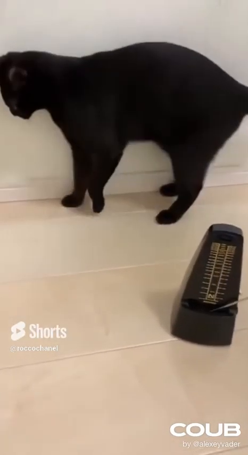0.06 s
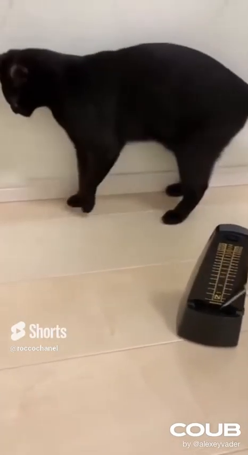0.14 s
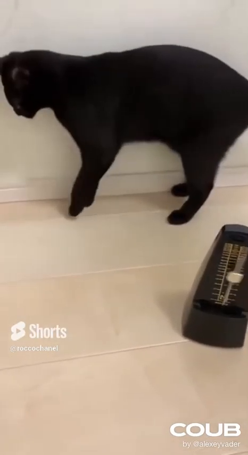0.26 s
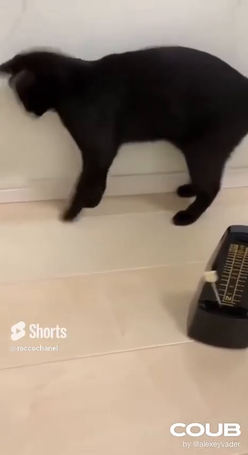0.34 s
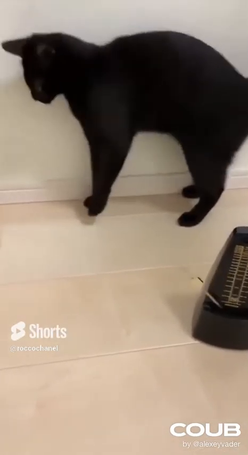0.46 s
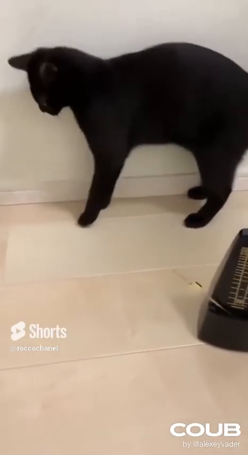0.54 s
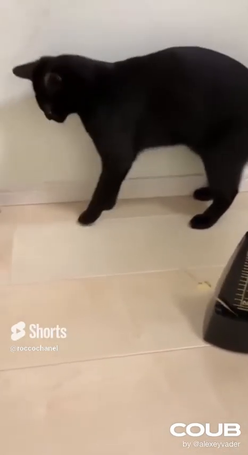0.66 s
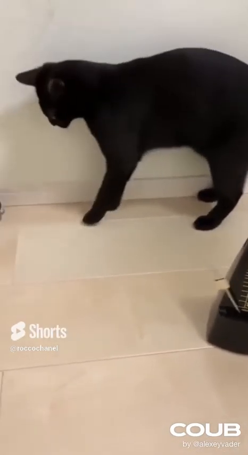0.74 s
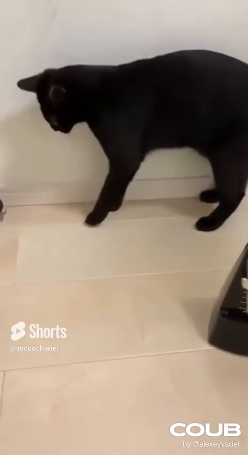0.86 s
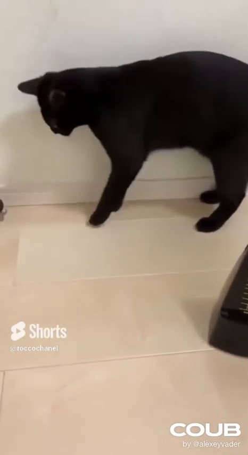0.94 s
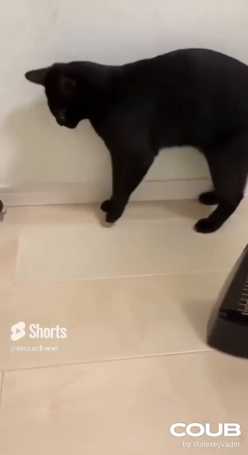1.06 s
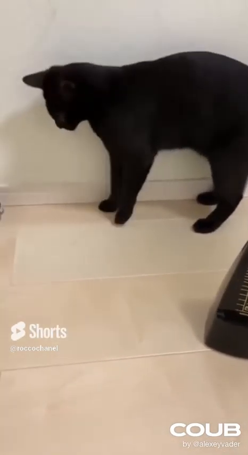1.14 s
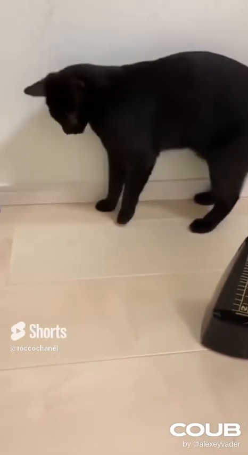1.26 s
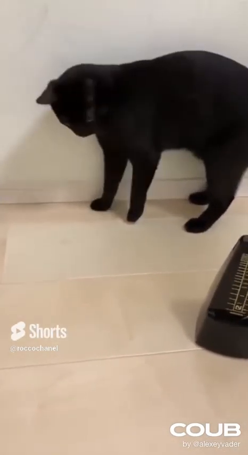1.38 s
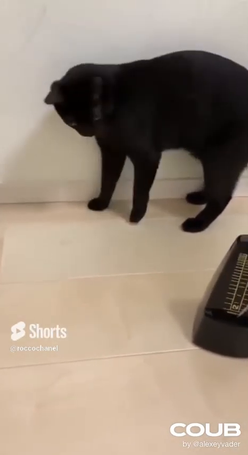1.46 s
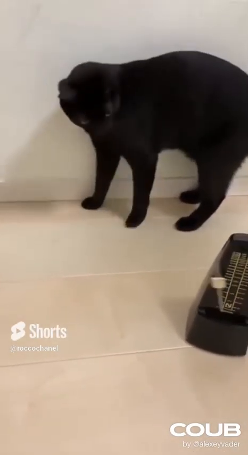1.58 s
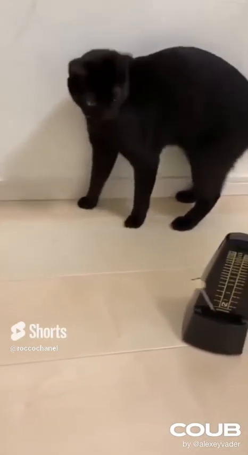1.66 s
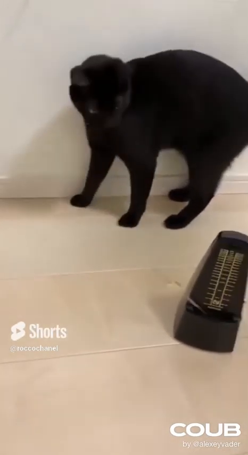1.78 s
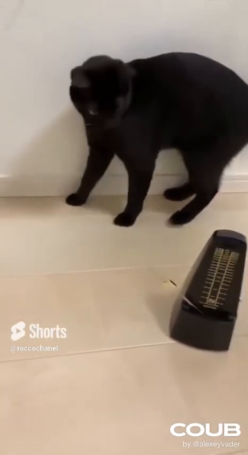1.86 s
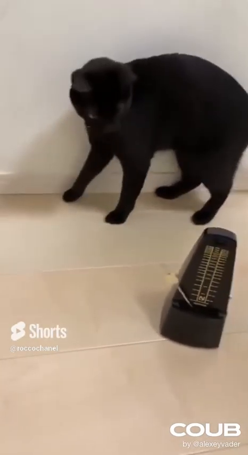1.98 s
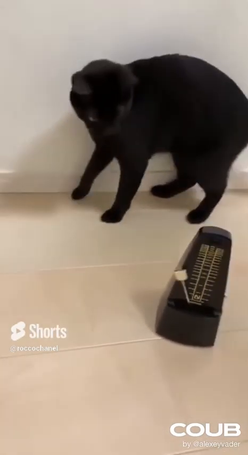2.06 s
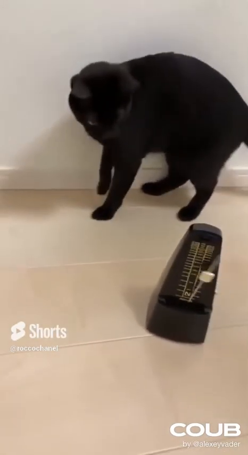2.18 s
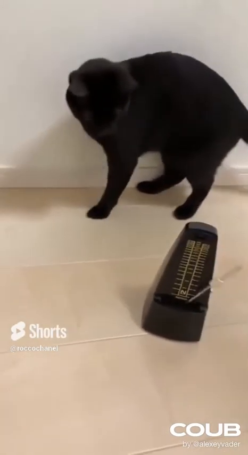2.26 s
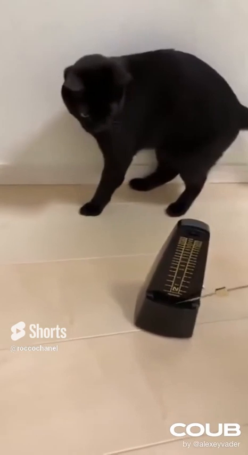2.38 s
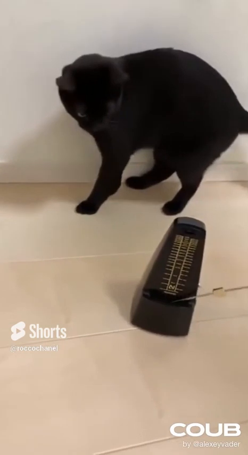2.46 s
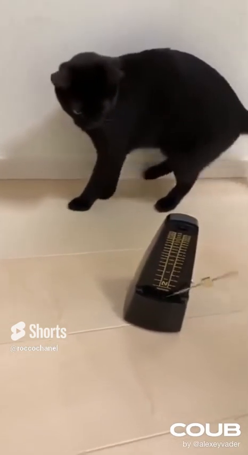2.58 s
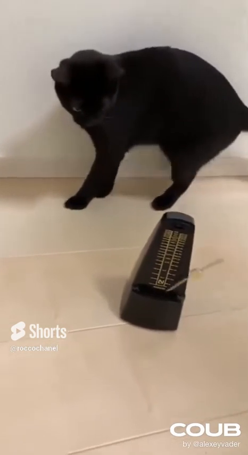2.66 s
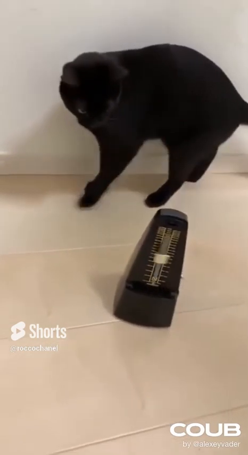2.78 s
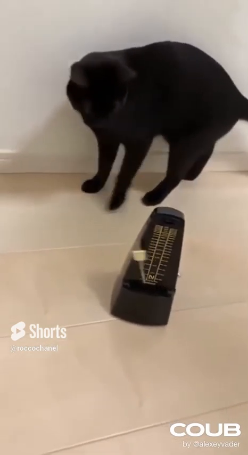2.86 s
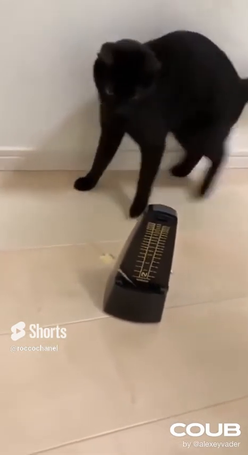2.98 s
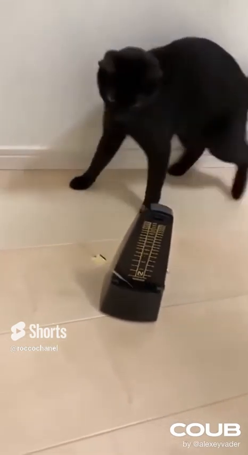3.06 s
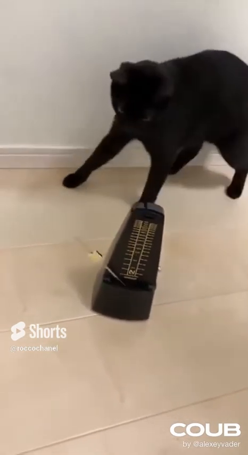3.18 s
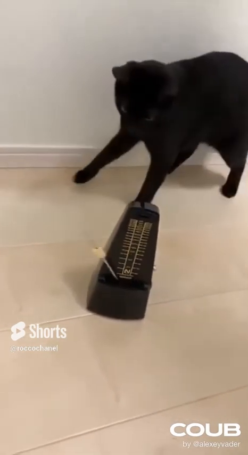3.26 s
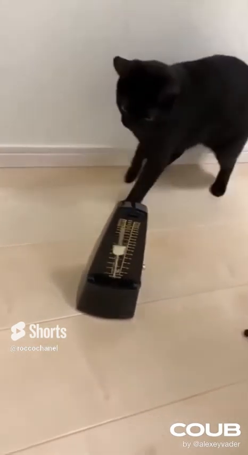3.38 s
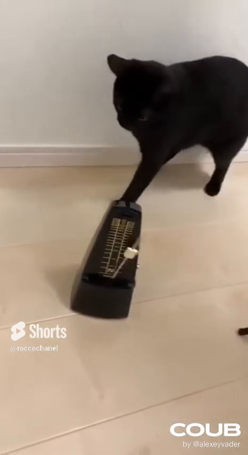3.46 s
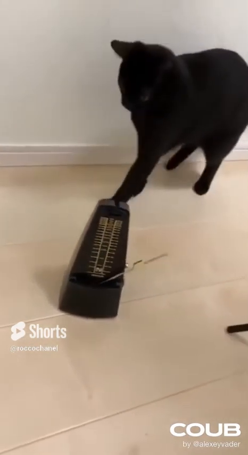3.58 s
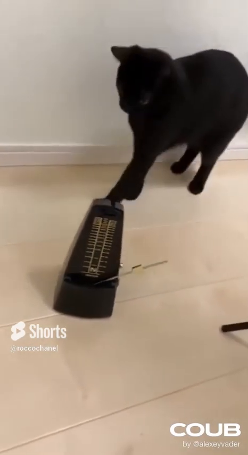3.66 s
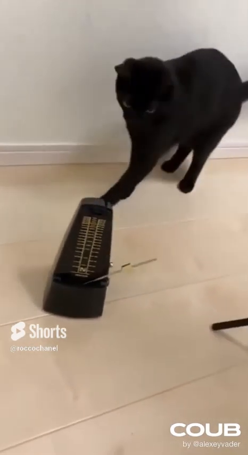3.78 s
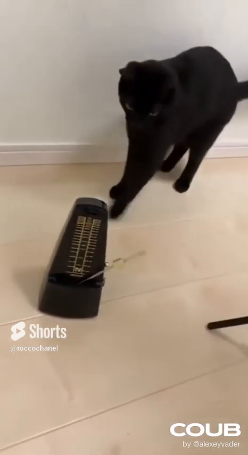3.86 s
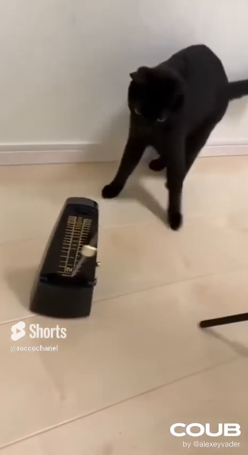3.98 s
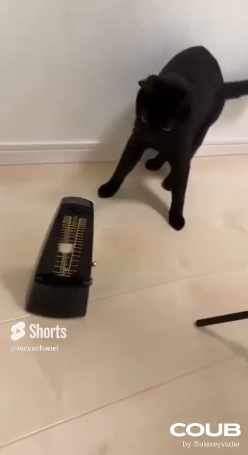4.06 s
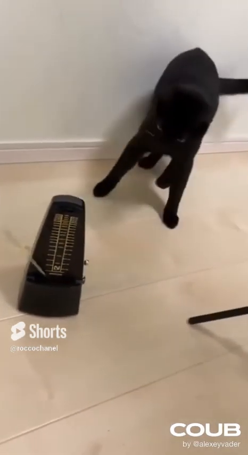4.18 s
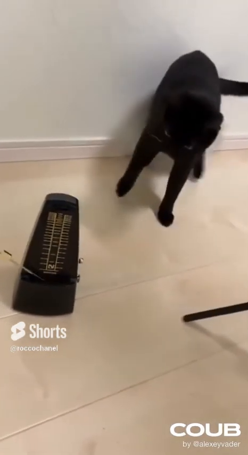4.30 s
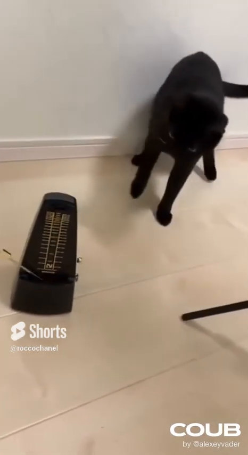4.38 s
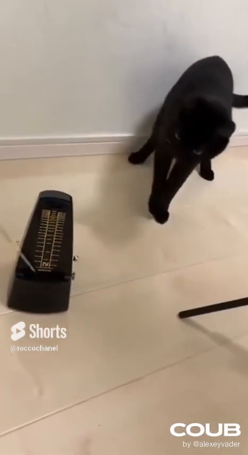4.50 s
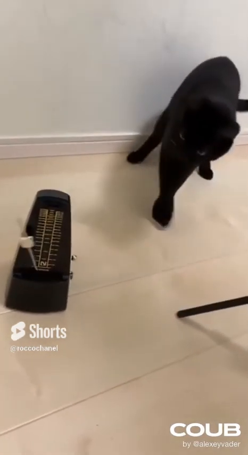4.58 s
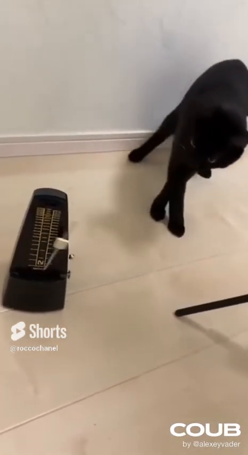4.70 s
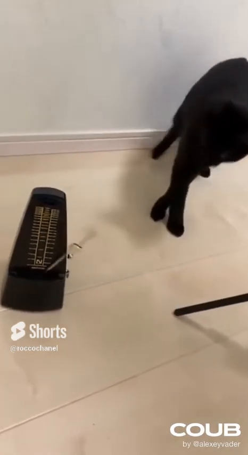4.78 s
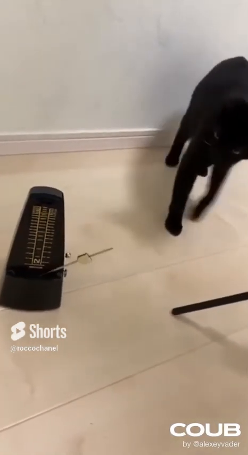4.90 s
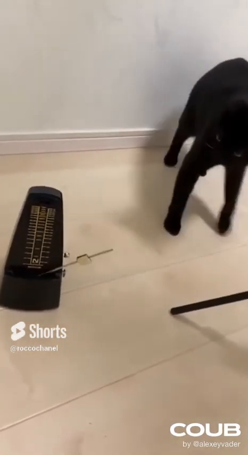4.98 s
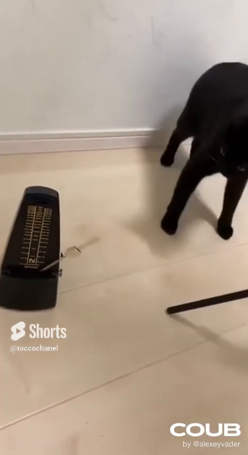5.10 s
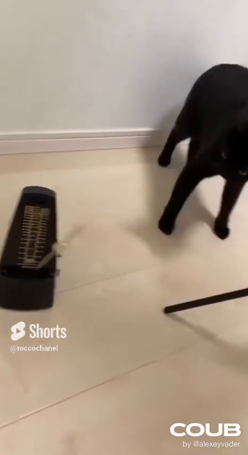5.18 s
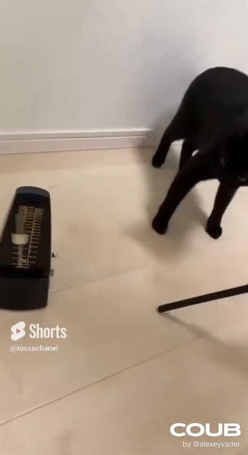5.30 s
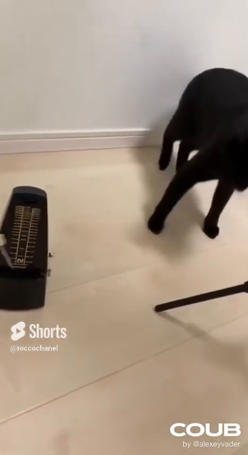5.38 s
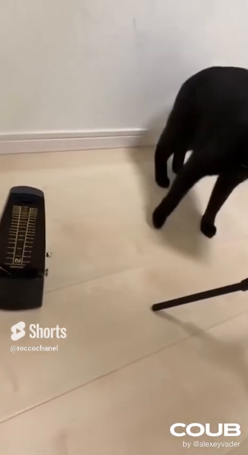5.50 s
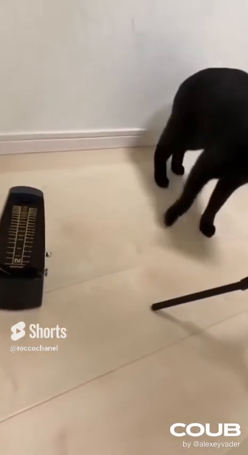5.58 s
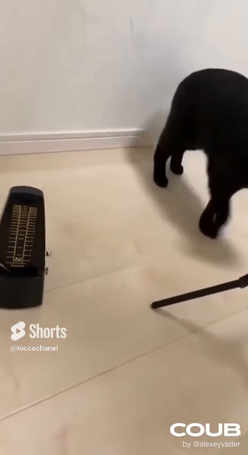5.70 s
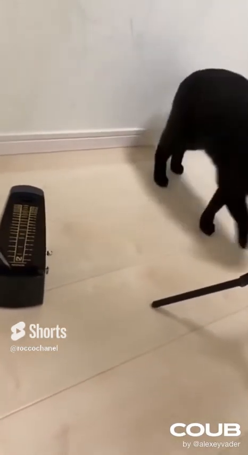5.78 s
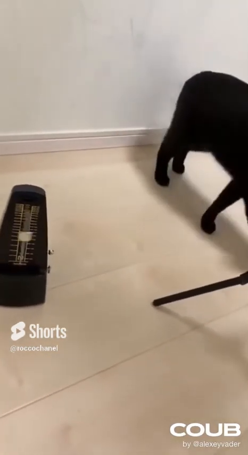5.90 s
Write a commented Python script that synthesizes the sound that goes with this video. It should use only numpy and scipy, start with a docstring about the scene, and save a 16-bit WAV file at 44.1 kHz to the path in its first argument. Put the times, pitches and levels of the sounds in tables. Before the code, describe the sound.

A wind-up pendulum metronome ticks close by on the wooden floor of a small, bare room. The first tick comes at about 0.4 seconds, and eight more follow evenly, roughly 0.63 seconds apart, the last near 5.4 seconds. Each is a sharp, bright mechanical clack, led in by a very faint swish and followed by a brief hollow ring of the plastic case, a short room echo and a soft low boom from the boards. The ticks vary slightly in strength and ring a little more from about 3.5 seconds on. A cat's paws are nearly inaudible: tiny scuffs around 2 and 2.6 seconds, a soft low thud near 3.2 seconds, and a fainter step just after 5 seconds. A faint, dull rush of ventilation with a wavering low hum continues underneath throughout.

```python
"""Metronome in a bare room

A wind-up pendulum metronome ticks on a wooden floor, about 95 beats a minute. Each beat is a clatter
of the escapement, an impulse that excites the modes of the plastic case, the reverberation of the
small room and the low modes of room and floor. A faint swish is heard just before each tick.
A cat steps about nearly unheard; the faint hum of ventilation lies underneath."""
import sys
import numpy as np
from scipy import signal
from scipy.fft import rfft, irfft
from scipy.io import wavfile

SR = 44100
rng = np.random.default_rng(int(sys.argv[2]) if len(sys.argv) > 2 else 0)


def persist_wave(psi):
    """Save psi, clipped to +-1, as 16-bit WAV."""
    counts = np.round(np.clip(psi, -1, 1) * 32767).astype(np.int16)
    wavfile.write(sys.argv[1], SR, np.atleast_2d(counts).T)


N = 261954
AGE = np.arange(SR * 3 // 4) / SR   # time since a blow, s


def from_db(db):
    """Amplitude ratio: a factor of ten for every 20 dB."""
    return 10 ** (np.asarray(db) / 20)


def at_hz(points, hz):
    """Interpolation of a table on a logarithmic frequency axis."""
    knots, values = np.transpose(points)
    return np.interp(np.log(np.maximum(hz, 1)), np.log(knots), values)


def unit_energy(x):
    """Normalisation of each row to energy 1."""
    return x / np.sqrt(np.sum(x ** 2, axis=-1, keepdims=True) + 1e-20)


def coloured(spectrum, size, tilt_db=0, ripple_db=0, ripple_hz=70):
    """Random-phase noise: two rows of rms 1, tilted per octave about 3 kHz, rippled by interference."""
    hz = np.arange(size // 2 + 1) * SR / size
    octaves = np.log2(np.maximum(hz, 1000) / 3000)
    ripple = np.interp(hz / ripple_hz, np.arange(1024), rng.standard_normal(size=1024))
    depth_db = ripple_db * (hz / 3000) ** 0.29   # short waves interfere more deeply
    gain = from_db(at_hz(spectrum, hz) + tilt_db * octaves + depth_db * np.minimum(ripple, 1))
    phasors = np.exp(2j * np.pi * rng.random((2, len(hz))))
    return unit_energy(irfft(gain * phasors, size)) * np.sqrt(size)


# side relative to middle, for direct and for diffuse sound: f/Hz, level/dB
WIDTH_DIRECT = [(300, -28.5), (1200, -19), (5000, -20), (8000, -14.5), (14000, -6.5)]
WIDTH_DIFFUSE = [(60, -28.5), (170, -19), (330, -13.5), (600, -5), (1200, -2), (4000, -2), (9000, -6.5)]


def stereo(pair, width, wider_db=0):
    """Interaural coherence: middle plus or minus side; long waves reach both ears alike."""
    size = pair.shape[-1]
    hz = np.arange(size // 2 + 1) * SR / size
    side = irfft(rfft(pair[1]) * from_db(at_hz(width, hz) + wider_db), size)
    return pair[0] + side * np.array([[1], [-1]])


def decay(t60):
    """Exponential damping: 60 dB in t60 seconds."""
    return from_db(-60 * AGE / t60)


def onset(build_s):
    """Smooth build-up of amplitude from 0 to 1."""
    return 1 - np.exp(-(AGE / build_s) ** 2)


def mode(hz, db, t60, build_s):
    """Damped oscillation: a sinusoid of random phase builds up and dies away."""
    return from_db(db) * onset(build_s) * decay(t60) * np.sin(2 * np.pi * (hz * AGE + rng.random()))


def add(out, t, sound):
    """Superposition of a sound starting at t seconds."""
    start = round(t * SR)
    out[:, start:start + sound.shape[-1]] += sound[..., :N - start]


# spectrum of the moving air: f/Hz, level/dB
AIR_SPECTRUM = [(20, -26), (50, -3), (90, 0), (135, -19.5), (185, -2.5), (260, -11), (440, -16),
                (650, -20.5), (1000, -32), (4000, -41), (4800, -45.5), (6500, -38.5), (11000, -47),
                (16000, -60)]
# resonances of the ventilation: f/Hz, bandwidth/Hz, level/dB
HUM_BANDS = [(316, 25, -67.5), (343, 25, -64), (369.9, 22, -63.5)]


def ventilation(air_db=-63.5):
    """Resonance: narrow bands of noise make a wavering hum over a dull rush of air."""
    hz = np.arange(N // 2 + 1) * SR / N
    out = from_db(air_db) * coloured(AIR_SPECTRUM, N)
    for centre, bandwidth, db in HUM_BANDS:
        resonance = 1 / (1 + (2 * (hz - centre) / bandwidth) ** 2)
        hum = irfft(rfft(rng.standard_normal((2, N))) * resonance, N)
        out += from_db(db) * unit_energy(hum) * np.sqrt(N)
    return stereo(out, WIDTH_DIFFUSE, wider_db=-0.5)


# spectrum of the clatter, also used for the faint swish and the scuff of paws: f/Hz, level/dB
CLATTER_SPECTRUM = [(120, -17.5), (300, -6), (800, 2), (2200, 0.5), (2900, -8.5), (3500, 4), (4150, 2),
                    (4700, -12), (5600, -2), (9500, -4), (10300, -11), (12500, -14), (16000, -21.5)]


def swish(rise_t60=.053, gain_db=-32, size=2205):
    """Exponential growth: a faint rising noise is heard just before each tick."""
    noise = coloured(CLATTER_SPECTRUM, len(AGE), tilt_db=-0.87, ripple_db=5, ripple_hz=120)
    fading = stereo(noise, WIDTH_DIRECT, wider_db=5.5) * decay(rise_t60)
    return from_db(gain_db) * fading[:, :size][:, ::-1]


def escapement(tilt_db, width_db, gain_db=-17, chatter_s=.0055, fade_s=.0024):
    """Impact and early reflection: the pallet chatters on the wheel; floor and wall throw it back."""
    contact = np.exp(-np.maximum(AGE - chatter_s, 0) / fade_s)
    chatter = coloured(CLATTER_SPECTRUM, len(AGE), tilt_db, ripple_db=7.5, ripple_hz=219.2)
    direct = stereo(chatter, WIDTH_DIRECT, width_db) * onset(build_s=.0015) * contact
    scatter = coloured(CLATTER_SPECTRUM, len(AGE), tilt_db, ripple_db=5, ripple_hz=110)
    reflected = stereo(scatter, WIDTH_DIFFUSE, wider_db=-3) * (1 - contact) * decay(t60=.085)
    return from_db(gain_db) * (direct + from_db(-6.5) * reflected)


# modes of the plastic case: f/Hz, level/dB, T60/s
CASE_MODES = [(500.5, -26.5, 0.076), (746, -31.5, .06), (945, -34, .11), (1112.7, -18, .07),
              (1265, -29, 0.077), (1715, -27, 0.078), (2200, -30.5, 0.063), (3198, -31, 0.07),
              (3450, -20.5, 0.048), (3498, -30, 0.08), (4000, -27, 0.015), (4070, -20.5, 0.054),
              (6260, -34, 0.06), (6640, -36, .06), (7720, -27, 0.035), (9100, -31, 0.033)]


def case(low_db, high_db, split_hz=2500, spread_db=2.16, detune=.002):
    """Free vibration: every beat strikes the modes of the case a little differently."""
    out = 0
    for hz, db, t60 in CASE_MODES:
        strength_db = (high_db if hz > split_hz else low_db) + spread_db * rng.normal()
        out += mode(hz * (1 + detune * rng.normal()), db + strength_db, t60, build_s=.0028)
    return out


# spectrum of the diffuse field: f/Hz, level/dB
REVERB_SPECTRUM = [(100, -17.5), (450, -4), (620, -5), (950, 1), (1450, -2.5), (2200, -2.5), (2900, -6),
                   (3900, -6.5), (4300, -11), (4750, -22), (5500, -8), (9500, -8), (10300, -11.5),
                   (16000, -28)]
# reverberation time of the room: f/Hz, T60/s
REVERB_TIME = [(150, 0.46), (500, .27), (1500, 0.26), (4000, 0.25), (8500, 0.23), (16000, .23)]


def reverberation(tilt_db, gain_db=-24, case_share=0.82, bands=10):
    """Diffuse reflection from bare walls, coloured by the case; each band decays at its own rate."""
    noise = coloured(REVERB_SPECTRUM, len(AGE), tilt_db, ripple_db=5, ripple_hz=74.78)
    spectrum = rfft(stereo(noise, WIDTH_DIFFUSE))
    hz = np.arange(spectrum.shape[-1]) * SR / len(AGE)
    case_peaks = sum(1 / (1 + ((hz - f) * t60) ** 2) for f, _, t60 in CASE_MODES)
    spectrum *= 1 + case_share * case_peaks
    centres = np.geomspace(100, 16000, bands)
    tail = 0
    for centre, share in zip(centres, np.eye(bands)):
        band = irfft(spectrum * np.interp(hz, centres, share), len(AGE))
        tail += band * decay(at_hz(REVERB_TIME, centre))
    return from_db(gain_db) * tail * onset(build_s=.0063)


# low modes between the walls: f/Hz, level/dB, T60/s
ROOM_MODES = [(152, -38, 0.25), (179.6, -38.5, .18), (271, -45, .25), (304, -31, 0.23), (343.4, -34.5, .28),
              (379, -41, 0.18)]


def standing_waves(spread_db=0.4):
    """Standing waves between the walls build up slowly and differ a little from ear to ear."""
    pair = np.zeros((2, len(AGE)))
    for row in pair:
        for hz, db, t60 in ROOM_MODES:
            row += mode(hz, db + spread_db * rng.normal(), t60, build_s=.02)
    return stereo(pair, WIDTH_DIFFUSE)


# beats: t/s, force/dB, blur/dB, left minus right/dB, floor boom/dB
BEATS = [(.388, .5, 8.5, -5, 1.5), (1.02, 0.5, 8, -.5, -10), (1.646, 2.5, -4, -.5, -7.5),
         (2.281, -2, 6, -6, -3), (2.906, 0.5, 4, 0, -9.5), (3.539, 2, 2.5, -0.5, -2),
         (4.166, 1, 0.5, 0, -10), (4.799, 1.5, -2, -.5, 0.5), (5.427, -2, 0.5, -0.5, 3)]
# the case rings out more as the listener moves round to its front: t/s, low modes/dB, high modes/dB
CASE_RADIATION = [(.4, 0, -3), (2.3, .5, -1.5), (4.6, 4.5, 4.5), (5.4, 1, 4)]


def metronome(room_db=0.51):
    """Impulse excitation: each beat drives case and room; blur means a louder swish and a wider tick."""
    out = np.zeros((2, N))
    times, low_db, high_db = np.transpose(CASE_RADIATION)
    for t, force_db, blur_db, pan_db, _ in BEATS:
        pan = from_db([[pan_db / 2], [-pan_db / 2]])
        tilt_db = -0.39 + 0.16 * force_db   # per octave: a harder beat is brighter
        lead = from_db(blur_db) * swish() * pan
        add(out, t + .001 - lead.shape[-1] / SR, lead)   # overlaps the tick by 1 ms
        clatter = from_db(force_db) * escapement(tilt_db, width_db=-2.5 + 1.17 * blur_db)
        ringing = case(np.interp(t, times, low_db), np.interp(t, times, high_db))
        room = reverberation(tilt_db) + standing_waves()
        add(out, t, (clatter + ringing) * pan + from_db(room_db) * room)
    return out


# lowest modes of floor and room: f/Hz, level/dB, T60/s
FLOOR_MODES = [(52.44, -33, 0.49), (74.8, -28, .27), (86, -38.5, .25)]


def floor_boom(delay_s=.024, build_s=.03):
    """Structure-borne sound: the swinging metronome rocks the boards, which answer after each beat."""
    out = np.zeros((2, N))
    for t, *_, boom_db in BEATS:
        boom = sum(mode(hz, db + boom_db, t60, build_s) for hz, db, t60 in FLOOR_MODES)
        add(out, t + delay_s, boom)
    return out


# paws on the boards: t/s, thud level/dB, scuff level/dB, scuff T60/s
PAW_STEPS = [(2.005, -65.5, -71, 0.13), (2.56, -65, -71, 0.096), (3.147, -36.5, -67, .25),
             (3.235, -45.5, -78, .1), (5.12, -55.5, -81, 0.12), (5.266, -79, -64, .06)]


def paws():
    """Soft impact and friction: paws move the lowest modes of the floor and brush the boards."""
    out = np.zeros((2, N))
    loudest_db = max(db for _, db, _ in FLOOR_MODES)
    attack = 1 - np.exp(-AGE / .0026)
    for t, thud_db, scuff_db, scuff_t60 in PAW_STEPS:
        thud = sum(mode(hz, thud_db + db - loudest_db, t60, build_s=.011) for hz, db, t60 in FLOOR_MODES)
        friction = stereo(coloured(CLATTER_SPECTRUM, len(AGE), tilt_db=0.5), WIDTH_DIFFUSE)
        scuff = from_db(scuff_db) * friction * attack * decay(scuff_t60)
        add(out, t, thud + scuff)
    return out


def scene():
    """Superposition of metronome, floor, cat and ventilation."""
    return metronome() + floor_boom() + paws() + ventilation()


def record(dry):
    """Band limiting: a steep elliptic low-pass at 16 kHz."""
    return signal.sosfilt(signal.ellip(10, .1, 90, 16000, fs=SR, output="sos"), dry)


dry = scene()
out = record(dry)
persist_wave(out)
```